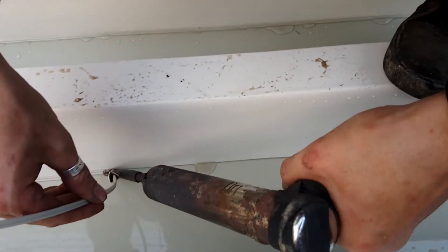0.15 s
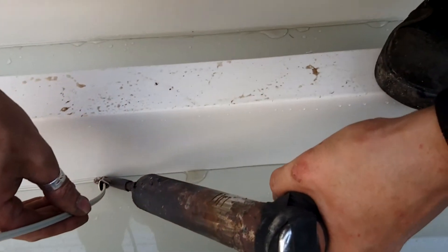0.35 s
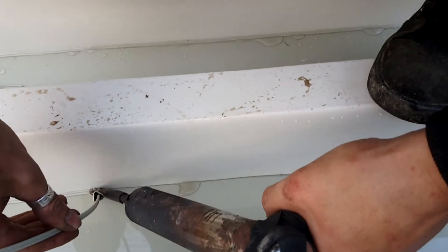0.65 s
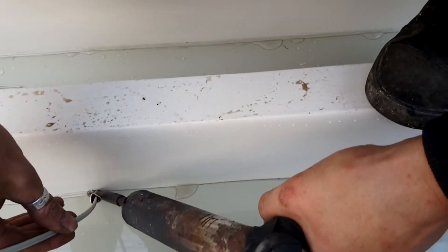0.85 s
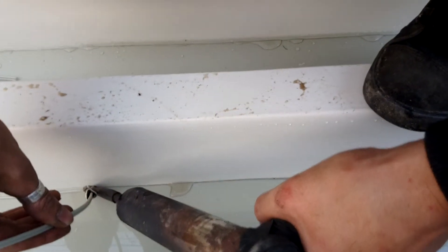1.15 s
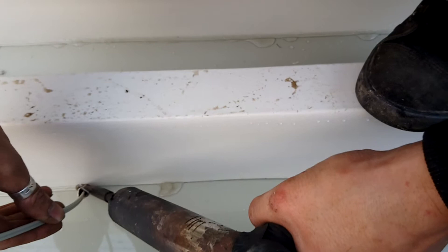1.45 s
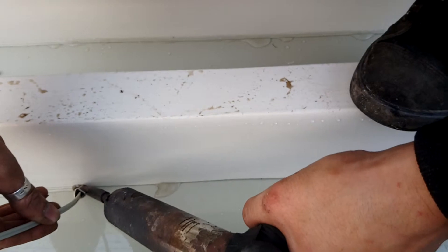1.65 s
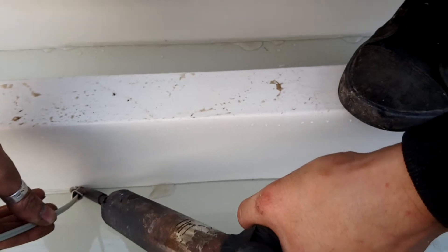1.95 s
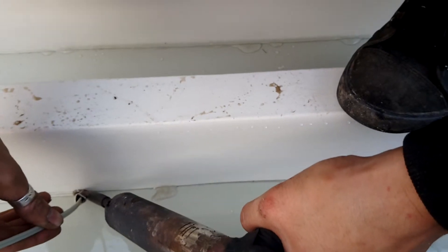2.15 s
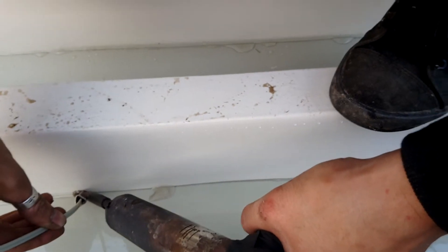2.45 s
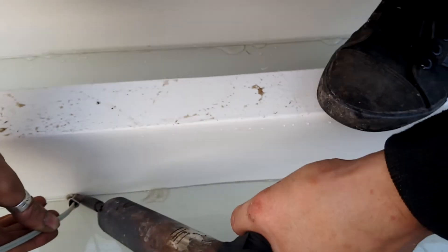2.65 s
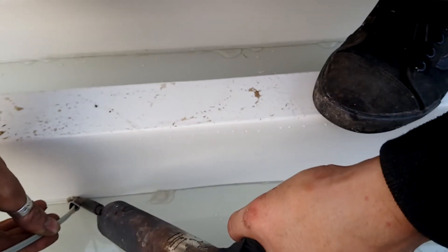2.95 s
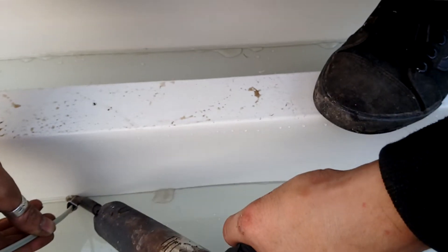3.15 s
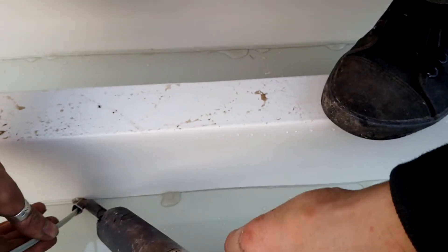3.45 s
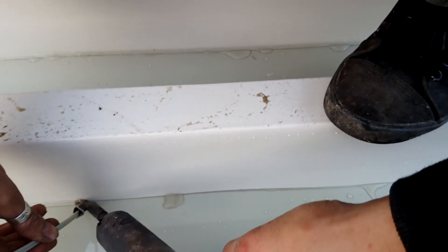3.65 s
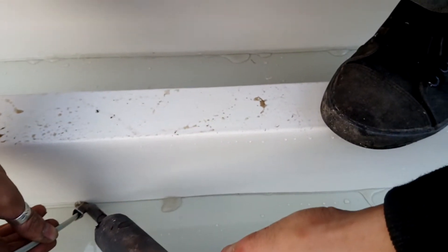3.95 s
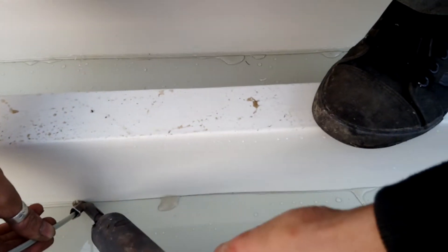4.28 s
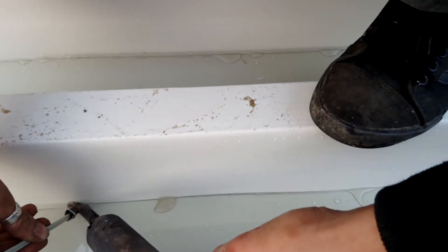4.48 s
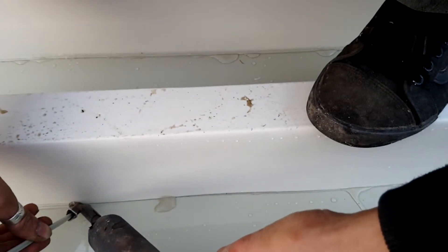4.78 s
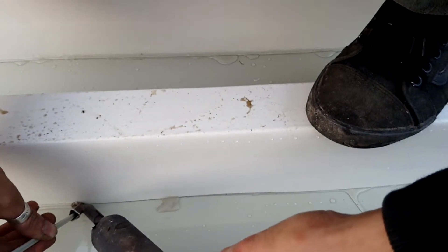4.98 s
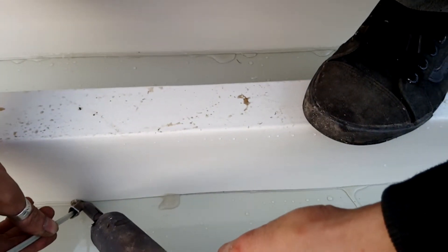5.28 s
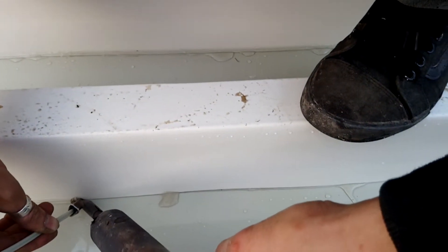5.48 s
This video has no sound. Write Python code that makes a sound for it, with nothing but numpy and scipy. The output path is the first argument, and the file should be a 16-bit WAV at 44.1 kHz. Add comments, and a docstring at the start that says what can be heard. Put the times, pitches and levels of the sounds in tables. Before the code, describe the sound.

A hand-held hot-air welder blows a steady, dense hiss very close to the microphone, bright and leaning to the left. Its whistling-airy colour changes gradually as the nozzle creeps along the plastic seam, then settles. Beneath it lies a quiet, dull indoor rumble with a few short soft swells. The stereo sound is already running at the start and continues unbroken to the end.

```python
"""Hot-air welding of a floor seam

A hot-air gun welds a plastic rod into the seam of a floor sheet, in a workshop.
The air jet hisses close by on the left: filtered noise, coloured by resonances of the gap between nozzle,
sheet and hand that come and go as the nozzle creeps along.
Underneath lies a dull noise rumble with a few room resonances and brief swells."""
import sys
import numpy as np
from scipy import signal
from scipy.fft import rfft, irfft
from scipy.io import wavfile
from scipy.ndimage import map_coordinates

SR = 44100
rng = np.random.default_rng(int(sys.argv[2]) if len(sys.argv) > 2 else 0)


def digitize_waveform(pressure):
    """Quantize a signal to 16-bit integers and store it at the path in sys.argv[1].

    Rows of a 2-D input are taken as channels; values are limited to [-1, 1].
    """
    field = np.atleast_2d(pressure).T
    bounded = np.clip(field, -1, 1)
    quanta = np.round(bounded * 32767).astype(np.int16)
    wavfile.write(sys.argv[1], SR, quanta)


N = 247842
TIME = np.arange(N) / SR  # s
HZ = np.maximum(np.arange(N // 2 + 1) * SR / N, 1e-3)  # kept above zero for the logarithm


def from_db(db):
    """Decibels to gain."""
    return 10 ** (np.asarray(db) / 20)


def bell(x, centre, spread):
    """A smooth Gaussian hump of height 1; spread is its standard deviation."""
    return np.exp(-0.5 * ((x - centre) / spread) ** 2)


def in_time(rows):
    """The columns of a time curve, interpolated at every sample."""
    seconds, *columns = np.transpose(rows)
    return [np.interp(TIME, seconds, column) for column in columns]


def over_hz(rows):
    """The columns of a spectrum, interpolated at every frequency on a logarithmic axis."""
    hz, *columns = np.transpose(rows)
    return np.array([np.interp(np.log(HZ), np.log(hz), column) for column in columns])


def drift(rate_hz):
    """Slow random wander with standard deviation 1: noise that thins out above the rate."""
    spectrum = rfft(rng.standard_normal(N)) / (1 + (HZ / rate_hz) ** 2)
    slow = irfft(spectrum, N)
    return slow / slow.std()


def turbulence(spectrum, shared):
    """Stereo noise: one part reaches both microphones directly, the rest arrives scattered."""
    common, *own = rfft(rng.standard_normal((3, N)))
    share, lead_rad = over_hz(shared)
    share = np.clip(share, 0, 1)
    # the right side lags in phase, so the left leads
    direct = common * np.exp(-1j * lead_rad * np.array([[0], [1]]))
    scattered = np.array(own)
    heard = np.sqrt(share) * direct + np.sqrt(1 - share) * scattered
    # the last factor brings white noise to 0 dB per Hz
    return irfft(heard * from_db(over_hz(spectrum)) * np.sqrt(SR / 2), N)


def resonate(x, hz, width_hz, boost_db):
    """A resonance lifts or hollows one band; its centre and its boost may change in time."""
    r = np.exp(-np.pi * width_hz / SR)
    turn = np.exp(2j * np.pi * np.cumsum(hz * np.ones(N)) / SR)
    # a fading memory that turns at the centre frequency
    memory = signal.lfilter([1 - r], [1, -r], x * turn.conj())
    ringing = 2 * (turn * memory).real
    return x + (from_db(boost_db) - 1) * ringing


def shelf(x, corner_hz, boost_db):
    """Raises or lowers everything above a corner."""
    top = irfft(rfft(x) * (1 - 1 / (1 + (HZ / corner_hz) ** 8)), N)
    return x + (from_db(boost_db) - 1) * top


def rumble():
    """Dull noise of moving air, ringing in the room, its upper part swelling now and then."""
    # noise before resonances and swells: (frequency [Hz], level [dB per Hz])
    low_spectrum = [(20, -82), (42, -82.5), (75, -73), (110, -67), (180, -67.5), (300, -66.5), (450, -68),
                    (650, -77.5), (900, -76.5), (1500, -108)]
    # what both microphones hear alike: (frequency [Hz], share of power [0-1], left lead [rad])
    low_shared = [(25, .75, 0), (60, 0.98, 0.035), (130, .985, 0), (390, 0.96, 0.17), (690, 0.75, 0.48)]
    # room resonances: (centre [Hz], width [Hz], boost [dB])
    room_modes = [(118, 18, 3.5), (155, 20, 3), (210, 14, 8), (296, 18, 6.5), (344, 7, 7), (537, 12, 4),
                  (640, 14, 6)]
    # brief swells: (time of peak [s], spread either way [s], height [dB])
    swells = [(0.389, 0.036, 8.5), (.69, 0.054, 3), (1.15, 0.17, 2.5), (1.6, 0.051, 9), (2.25, 0.054, 6),
              (3.48, 0.034, 2.5), (5.03, 0.044, 8.5), (5.32, 0.046, 7.5)]

    low = turbulence(low_spectrum, low_shared)
    for hz, width_hz, boost_db in room_modes:
        low = resonate(low, hz, width_hz, boost_db)
    swell_db = sum(height_db * bell(TIME, at_s, spread_s) for at_s, spread_s, height_db in swells)
    return shelf(low, corner_hz=442, boost_db=swell_db)


def air_jet():
    """Smooth jet noise through resonances of gun and gap; the nozzle's place decides which gap modes speak."""
    # jet noise before the resonances: (frequency [Hz], left level [dB per Hz], right level [dB per Hz])
    jet_spectrum = [(300, -87, -87), (646, -71.5, -70), (990, -75.5, -75.0), (1710, -73.5, -71),
                    (2450, -68.5, -64), (3175, -63, -63.5), (4180, -56, -57), (5600, -57, -61.5),
                    (6560, -55, -68), (8150, -69, -83), (9340, -67, -88), (10970, -69, -85.5),
                    (13600, -81, -107.8), (14860, -69.5, -90)]
    # direct path to both microphones; the lead comes from bending round the housing:
    # (frequency [Hz], share of power [0-1], left lead [rad])
    direct_path = [(500, 0.13, -0.51), (920, 0.75, 0.79), (1254, 0.62, -1.05), (1980, 0.81, 0.39),
                   (2350, 0.87, 0.23), (2900, 0.8, 0.4), (3730, 1, 0.53), (4780, 0.42, -0.077),
                   (6600, 0.7, -0.2), (8200, 0.35, -0.72), (12000, 0.16, -0.02)]
    # steady resonances and hollows of the gun: (centre [Hz], width [Hz], left boost [dB], right boost [dB])
    gun_modes = [(1254, 195, 5, 4.5), (2146, 400, 5, -2.5), (2485, 270, -1, 3)]
    # resonances of the gap between nozzle, sheet and hand; boosts hold at the best place, before the tremor:
    # (centre [Hz], width [Hz], best place [share of travel], left boost [dB], right boost [dB])
    gap_modes = [(2953, 130, 0.81, 5.5, 11), (3230, 274, 1.03, 8.5, 8), (3590, 210, 0.36, 3.5, 6),
                 (3760, 75, 0.78, 4.5, 7.5), (3970, 270, 0, -1, 8), (3930, 220, 1.02, 4.5, -10),
                 (4255, 150, 0.42, 3.5, -4), (4270, 100, 0.9, 3.5, 2.5), (4755, 146, 0.81, 10, 3.5),
                 (5230, 82, .22, 9.5, -1), (5350, 230, 0, 6, 9.1), (6100, 700, 0.45, 3, 3),
                 (6635, 100, 0.74, 7.5, 7), (6840, 430, 0.03, 9, 7)]
    # strength of the jet on the seam, before its flutter: (time [s], level [dB])
    flow = [(0, -0.7), (.25, -0.9), (.65, 1), (2.1, 0.54), (3.1, -0.22), (4.4, -0.05), (5.62, -0.1)]
    # the nozzle creeps along the seam and comes almost to rest: (time [s], place [share of travel])
    travel = [(0, 0.14), (1, 0.35), (2, 0.54), (2.8, 0.64), (3.6, 0.96), (5.62, 0.91)]
    reach = 0.23  # how far from its best place a gap resonance still speaks, share of travel
    left_lead_s = 0.00032  # the left microphone is nearer the nozzle

    (hiss_db,), (place,) = in_time(flow), in_time(travel)
    air = turbulence(jet_spectrum, direct_path)
    for hz, width_hz, left_db, right_db in gun_modes:
        air = resonate(air, hz, width_hz, np.array([[left_db], [right_db]]))
    for hz, width_hz, best_place, left_db, right_db in gap_modes:
        boost_db = bell(place, best_place, reach) * np.array([[left_db], [right_db]])
        tremor_db = 0.57 * drift(rate_hz=22)  # eddies feed each resonance unevenly
        air = resonate(air, hz, width_hz, boost_db + tremor_db)
    # the reflection off the sheet hollows one treble band, which sinks along the seam
    air = resonate(air, hz=12410 - 1640 * place, width_hz=2300, boost_db=-11)
    # the top of the hiss flutters more than its body
    air = shelf(air, corner_hz=7800, boost_db=0.26 * drift(rate_hz=1))
    air = resonate(air, hz=8800, width_hz=3700, boost_db=0.75 * drift(rate_hz=29))
    air = shelf(air, corner_hz=11500, boost_db=0.78 * drift(rate_hz=18))
    left, right = air * from_db(hiss_db + 0.12 * drift(rate_hz=43))
    late_right = map_coordinates(right, [(TIME - left_lead_s) * SR], order=5, mode="mirror")
    return np.array([left, late_right])


def scene():
    """The hiss over the rumble."""
    return air_jet() + rumble()


def record(dry):
    """A steep elliptic low-pass cuts the top."""
    cutoff_hz = 15480
    low_pass = signal.ellip(14, 0.1, 90, cutoff_hz, fs=SR, output="sos")  # ripple and rejection in dB
    return signal.sosfilt(low_pass, dry)


dry = scene()
out = record(dry)
digitize_waveform(out)
```